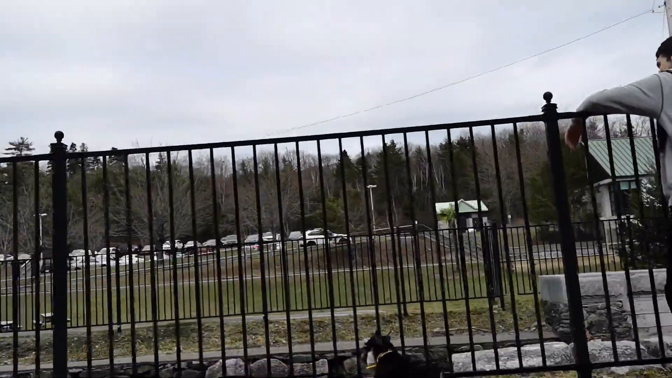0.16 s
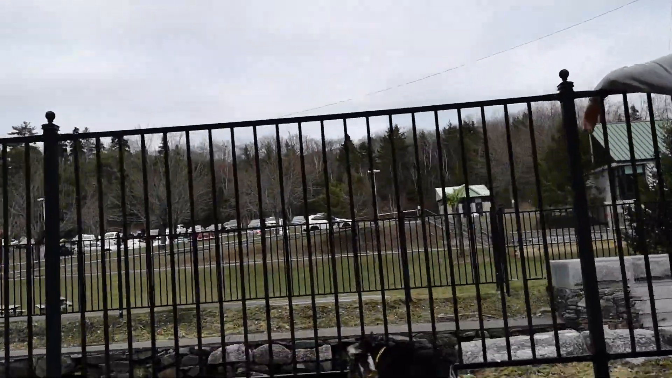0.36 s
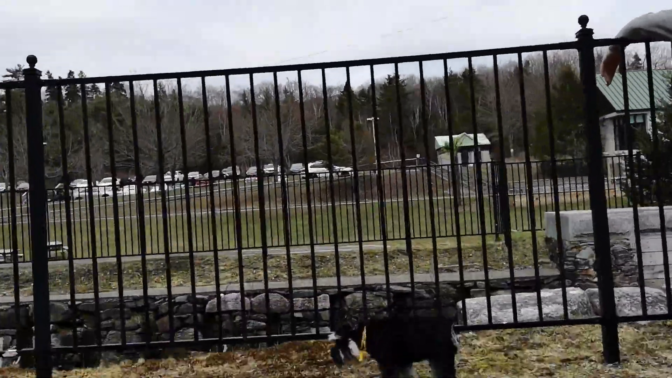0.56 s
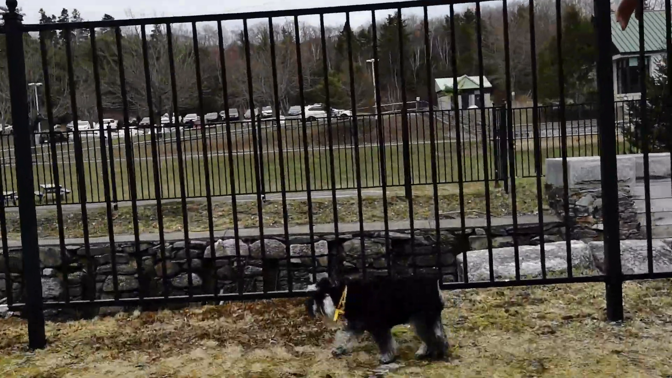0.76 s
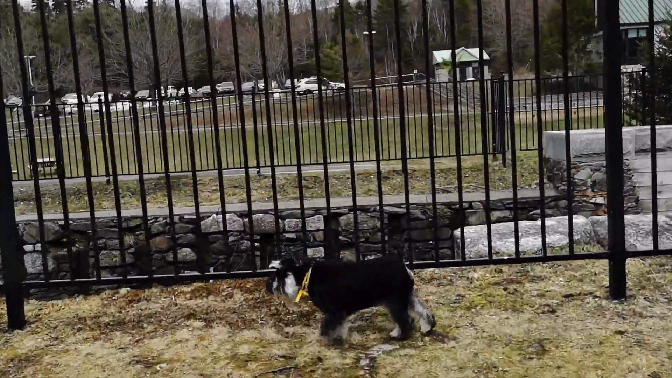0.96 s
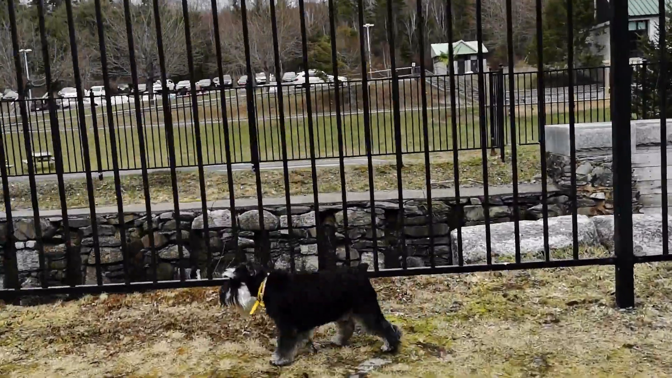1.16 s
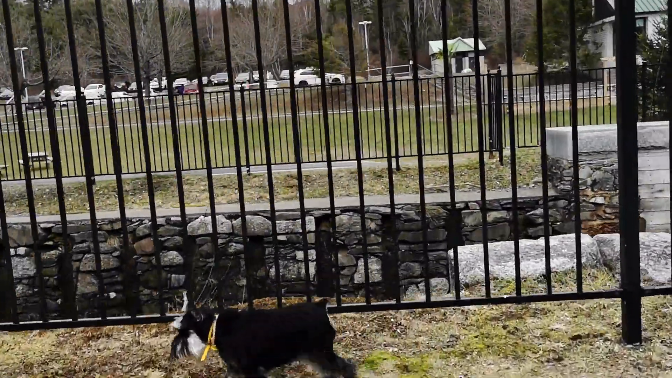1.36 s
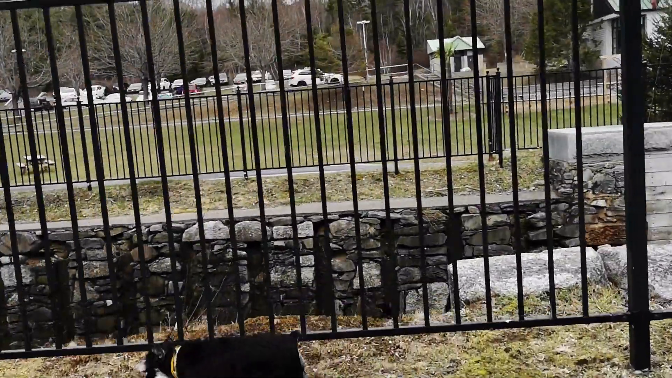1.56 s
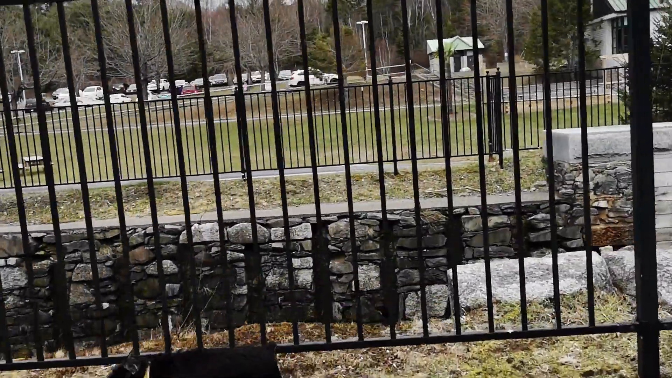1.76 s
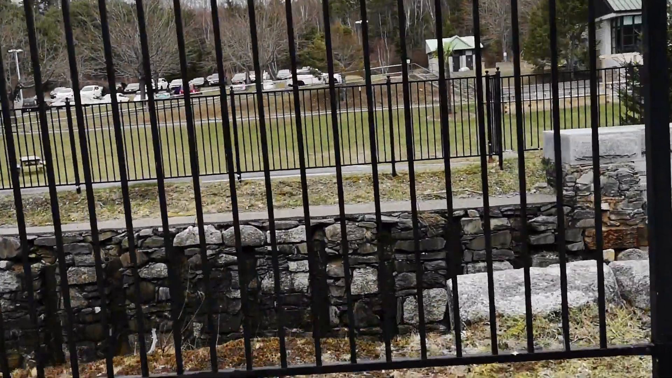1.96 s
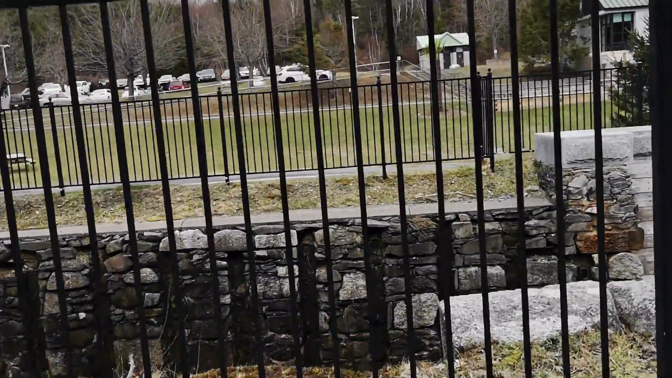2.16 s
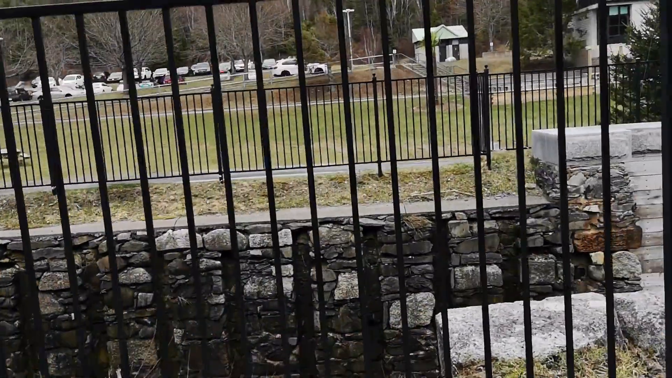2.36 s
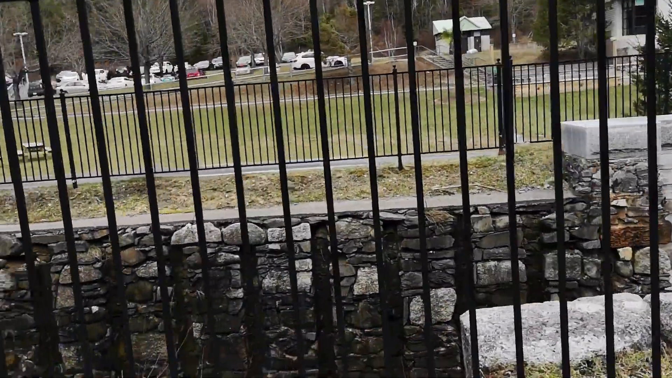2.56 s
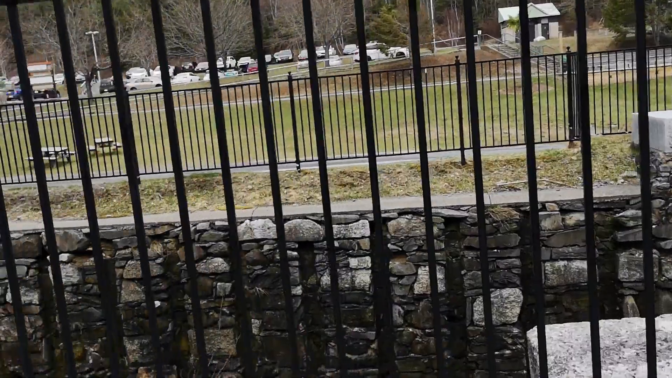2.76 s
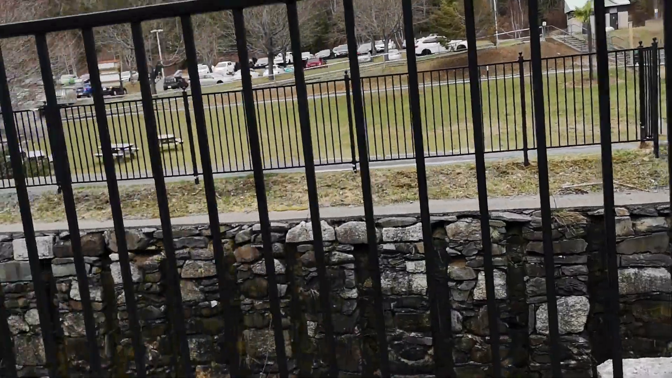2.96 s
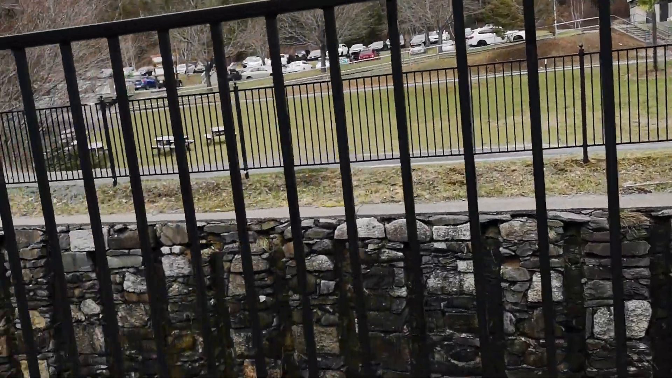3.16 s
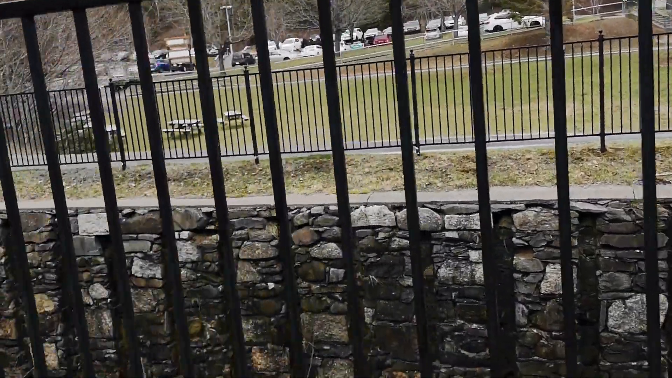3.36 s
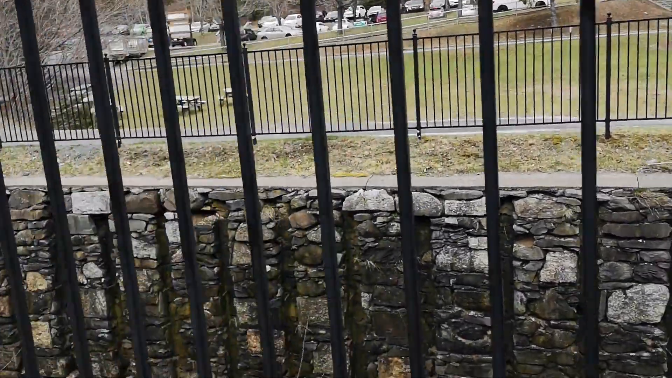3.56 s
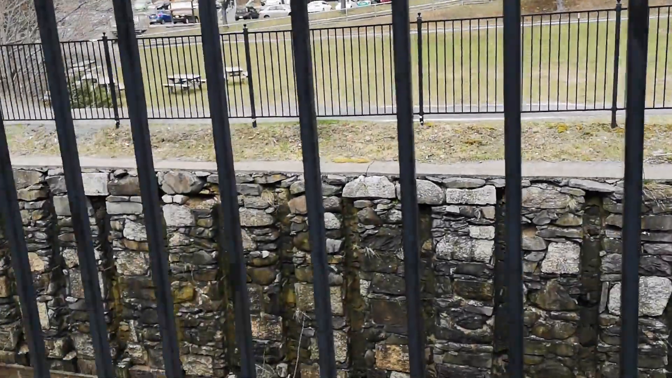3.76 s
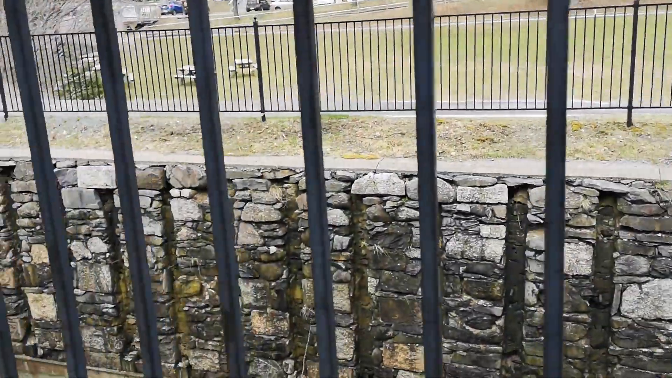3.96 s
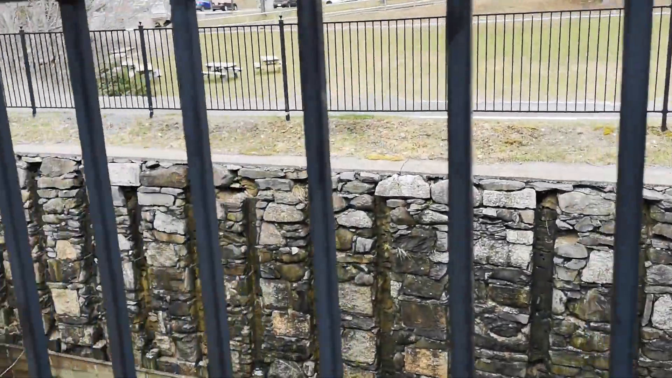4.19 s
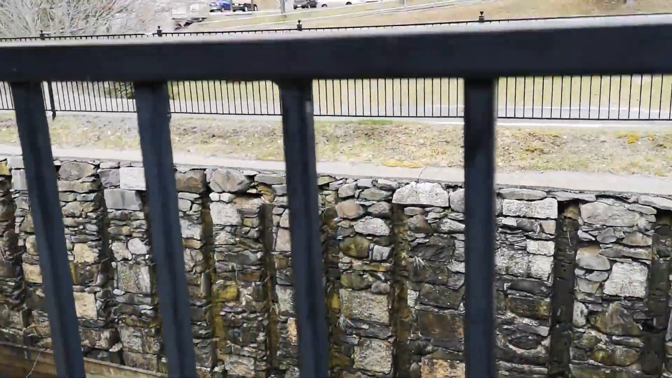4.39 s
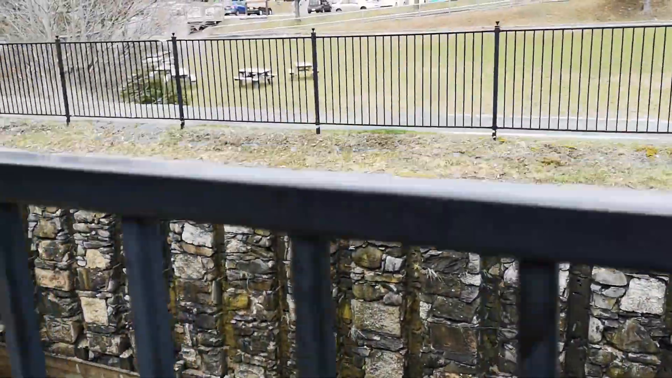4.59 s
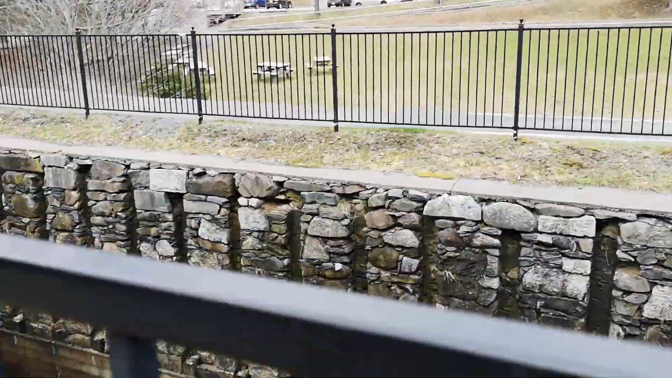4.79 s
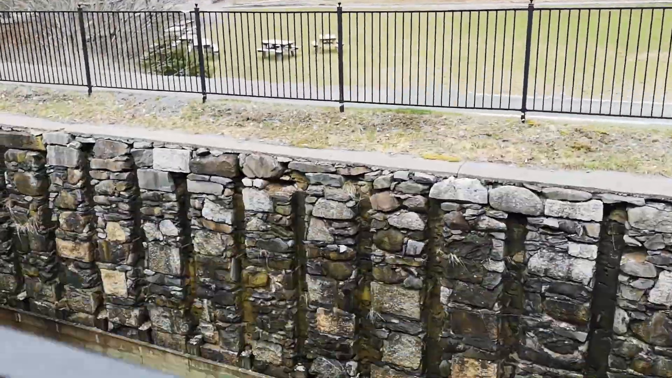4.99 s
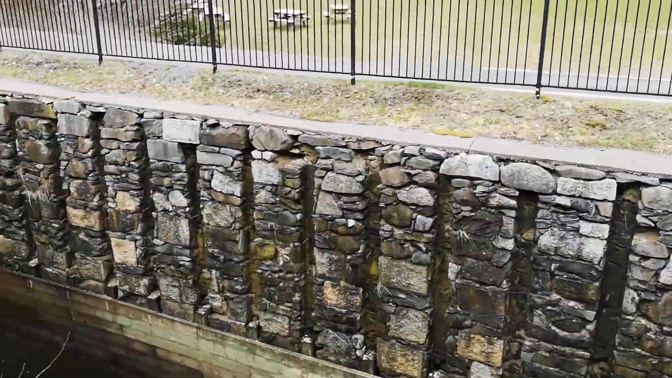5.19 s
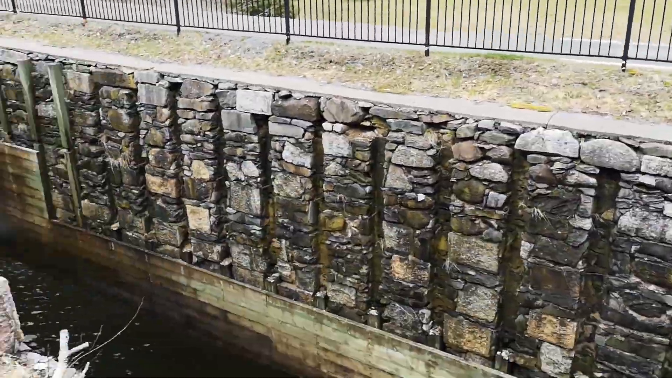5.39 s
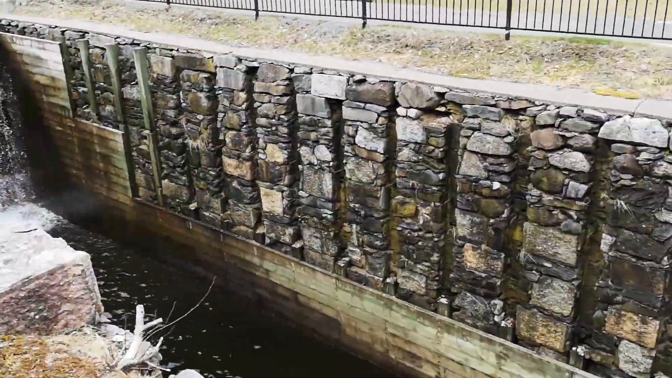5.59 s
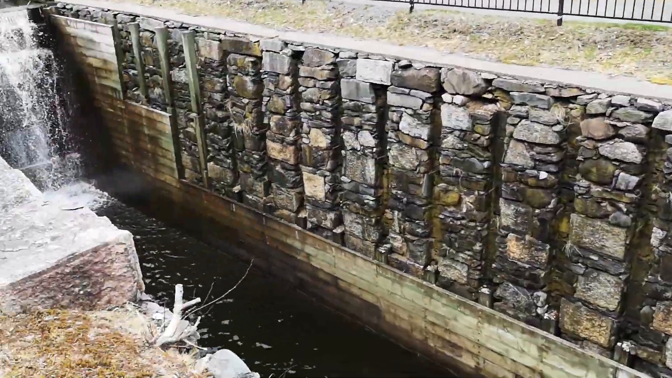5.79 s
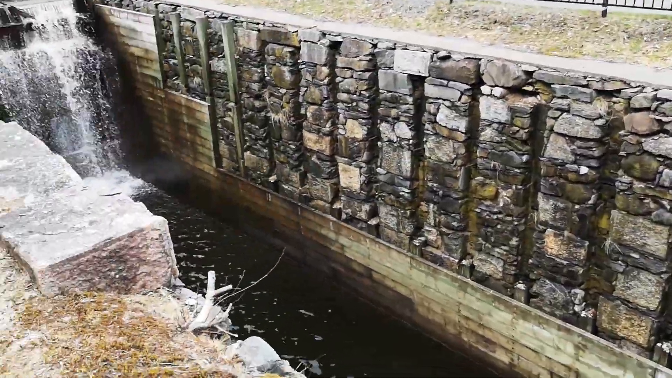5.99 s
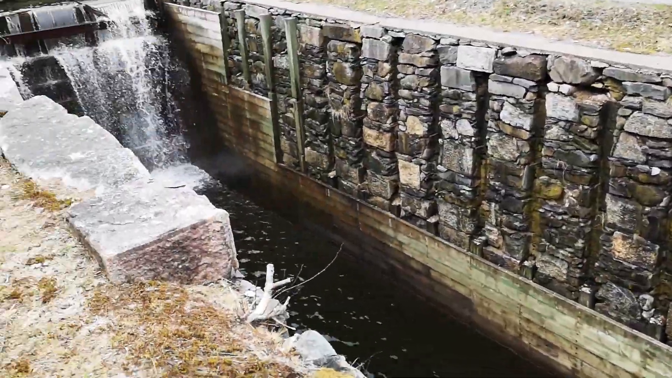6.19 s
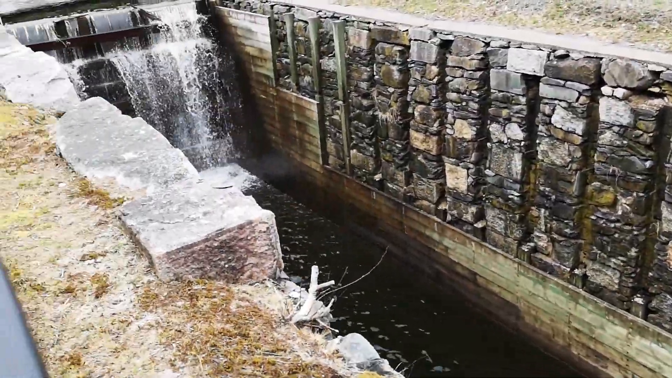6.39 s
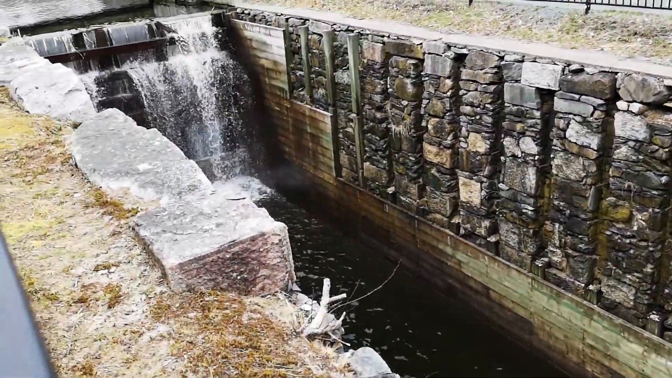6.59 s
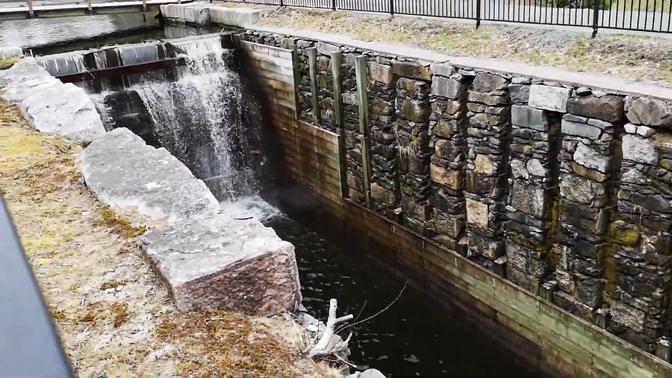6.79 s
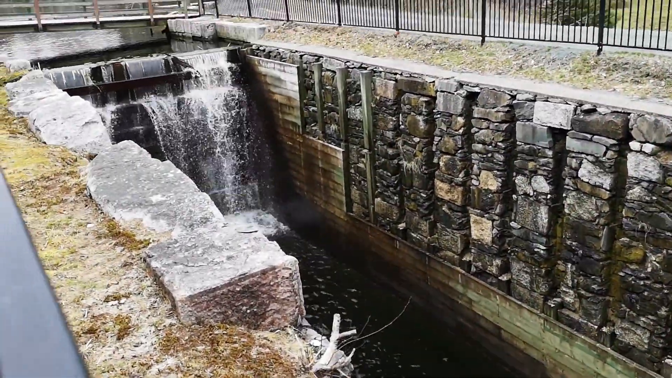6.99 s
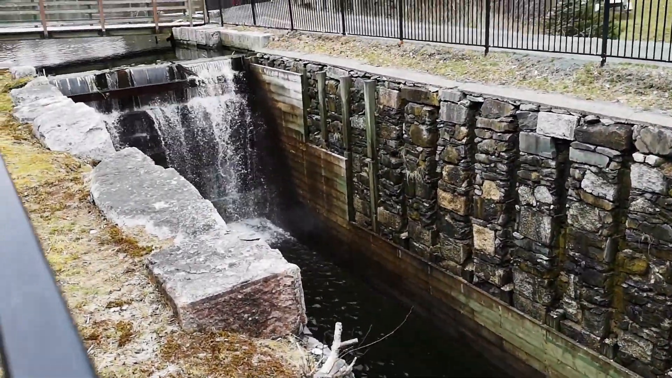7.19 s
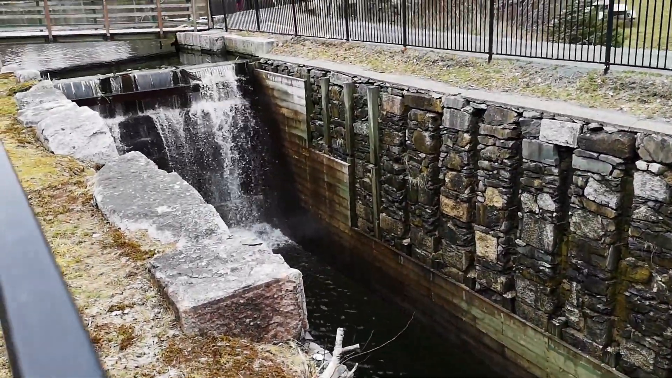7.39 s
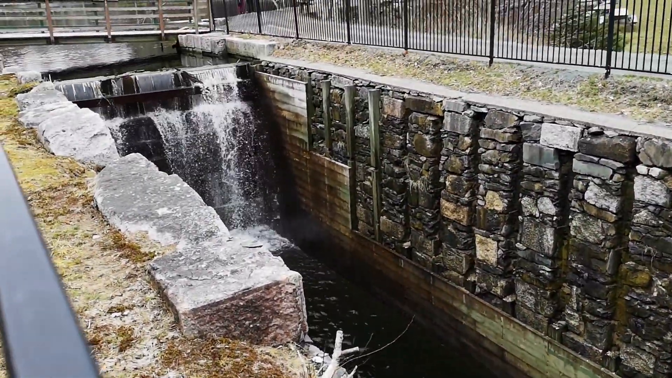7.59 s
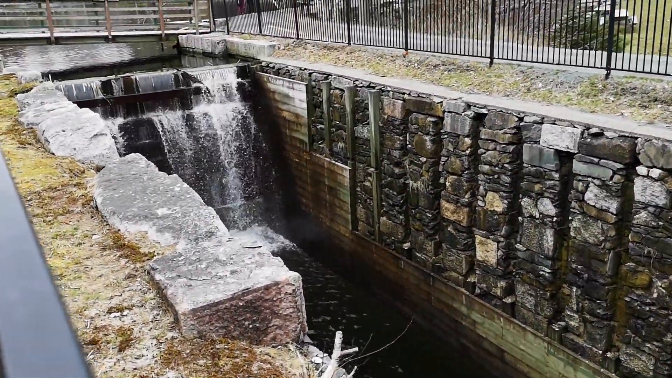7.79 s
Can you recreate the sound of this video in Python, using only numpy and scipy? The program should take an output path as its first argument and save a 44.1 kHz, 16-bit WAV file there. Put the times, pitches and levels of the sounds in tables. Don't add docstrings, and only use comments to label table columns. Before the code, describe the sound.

Outdoors in a park, a small waterfall pours into a stone-walled channel. Its steady roar and hiss begin at a distance, rise as a hand-held phone approaches the railing, then hold close and bright. A husky bird call fades at the very start, a twig snaps faintly, and low wind puffs and dull grip bumps touch the microphone, mostly near the end.

```python
import sys
import numpy as np
from scipy import signal
from scipy.fft import rfft, irfft, next_fast_len
from scipy.io import wavfile
from scipy.ndimage import uniform_filter1d, map_coordinates

SR = 44100
rng = np.random.default_rng(int(sys.argv[2]) if len(sys.argv) > 2 else 0)


def log_audio(samples):
    frames = np.atleast_2d(samples).T
    limited = np.clip(frames, -1, 1)
    pcm = np.round(limited * 32767).astype(np.int16)
    wavfile.write(sys.argv[1], SR, pcm)


def elevation(decibels):
    levels = np.asarray(decibels, float)
    return 10 ** (levels / 20)


N = 346185

# time in seconds, path to the fall in metres.
WALK = [(0, 17.3), (.57, 17.6), (1.5, 13.3), (2.47, 10.3), (3.12, 8.8), (3.54, 8.5), (3.89, 7.7),
        (4.24, 6.7), (4.5, 6.2), (4.66, 6.1), (5.0, 6.2), (5.44, 5.8), (5.98, 6.1), (6.06, 6.1),
        (6.8, 5.94), (7.85, 5.85)]
# time in seconds, bearing number
TURN = [
    (1, 0),
    (2.3, 1),
    (3.75, 1),
    (4.1, 2),
    (4.5, 2),
    (4.7, 3),
    (5.5, 3),
    (6.1, 4),
    (6.75, 5),
]
# bearing number, roar left over right in dB, spray over roar in dB,
# spray left over right in dB.
WATER_BALANCE = [
    (0, -4.5, -1.15, -2.6),
    (1, -3.5, -.4, -1.3),
    (2, 0.4, -0.65, 1.1),
    (3, 1.5, -1.1, -0.5),
    (4, 0.5, 0.8, -0.3),
    (5, 0.6, .1, -3.8),
]
# frequency in Hz, left level in dB, right level in dB,
# likeness of the two ports from 0 to 1, phase turn in radians.
ROAR_FAR = [(250.0, -11, 0.5, 1, 1.2), (350.0, -8.5, -6.5, 0.75, 0.5), (430, -15, -7.5, 0.36, -3),
            (557, -6.5, -10.5, 0.8, -3), (700.0, -6.5, -9, 0.23, -3), (845, -6, -8.5, 0.74, -0.4),
            (1030, -8.5, -2.5, 0.92, -1.76), (1350.0, -11, -8.5, 0.56, 1.9), (1620, -8, -6, 0.6, -3),
            (1820, -1.5, 2.5, 0.9, -0.8), (2250.0, -9, -2, 0.7, -2), (2720, -3.5, -2, 0.36, -2.5),
            (3240, -12.5, -8.5, 0.53, -3), (4200.0, -7, -4, 0.06, -4)]
ROAR_AWAY = [(250.0, -10, -1.5, 0.66, 0.1), (355, -10, -7.5, 1, -0.5), (436, -19, -7.5, 0.28, -3.5),
             (563, -11, -13.5, 0.9, -3.0), (704, -9.5, -14.5, 0.31, -4), (850.0, -6, -9, 0.66, -0.5),
             (1030, -6, -1, 0.62, -1), (1280, -15, -6.5, 0.43, -0.2), (1600.0, -4.5, -2, 0.84, 3.5),
             (1880, -8.5, 0.5, 0.38, -0.5), (2160, -3.5, 0.3, 0.62, -1.4), (2630, -5, -3, 0.35, -2.5),
             (3320, -8.5, -8, 0.44, -2.1), (4200.0, -6, -7.5, 0.13, -16)]
ROAR_RAIL = [(250.0, -8, -2, 0.89, 0), (345, -11.5, -7.4, 0.9, 0.0), (440.0, -17, -11, 0.14, 1),
             (560.0, -10.5, -14, 0.97, -3), (700.0, -15, -11.5, 0.33, -2.5), (840, -3.5, -11, 0.68, -1),
             (1050.0, -6.5, -1, 0.95, -0.3), (1360, -9.5, -7.5, 0.32, -1.5), (1600.0, -2, -4, 0.33, -2),
             (1900.0, -2, -5, 0.29, -1.5), (2220, 1, 0.5, 0.82, -2.5), (2680, -3.5, -5.5, 0.22, 0),
             (3240, -6.5, -9.5, 0.5, -1.1), (4200.0, -12, -9, 0.11, -6)]
ROAR_WALL = [(250.0, -12, -5, 0.61, 0), (352, -11.5, -9.5, 0.86, -0.0), (440.0, -17, -10.6, 0.32, -3),
             (547, -10.5, -14.5, 0.83, -3), (706, -9, -14, 0.44, -2.5), (840, -6, -9, 0.59, -0.7),
             (1060, -5.5, -5, 0.64, -0.7), (1370, -13, -5, 0.39, -1), (1600.0, -1.5, -5.5, 0.27, -1.5),
             (1900.0, 0.5, -2.5, 0.34, -1.5), (2250.0, 0, -4, 0.5, -0.6), (2790, -0.3, -3.5, 0.61, -1.4),
             (3100, -8, -11.5, 0.05, -8), (4200.0, -5.5, -4.5, 0.22, 1)]
ROAR_FALL = [(241, -3.5, -3.5, 0.96, -0.5), (350.0, -13, -9.5, 0.96, -0.1), (448, -17, -12.5, 0.54, 0.9),
             (565, -16.5, -15, 1, 4), (660, -20.5, -18, 0.25, 0.5), (840, -8.5, -6.5, 1, -1.5),
             (1010, -6, -5, 0.8, -1), (1360, -8.5, -6.5, 0.81, -1.5), (1550, -12, -9, 0.56, 2),
             (1920, -1.5, -0.5, 0.16, 0), (2340, -0.5, -4, 0.56, 2.5), (2700.0, -6, -12, 0.18, 1.5),
             (3100, -8.5, -8.5, 0.29, 1.5), (4200.0, -12, -4.5, 0.27, 2.5)]
# frequency in Hz, left level in dB, right level in dB.
SPRAY_AWAY = [(3800.0, -10, -7), (4800.0, -4.5, -3.5), (5930, -2.5, -3), (6350, -4.5, -5.5),
              (7050, -2.5, -1), (7600, 0.5, -2.5), (8400.0, -3.5, -5), (9000.0, -6.5, -0.5), (9500, -9, -5),
              (9940, -22, -8.5), (11500.0, -23, -15.5), (13100, -19.5, -21.5), (15000.0, -27, -21.5)]
SPRAY_RAIL = [(3800.0, -14, -8), (4800.0, -14.3, -9), (5700, -9, -6), (6150, -10, -12), (7000.0, -2.5, -6),
              (7800.0, -2, -8), (8400.0, -6, -10), (9000.0, -4.5, -6.5), (9460, -15.0, -9),
              (10000.0, -19.3, -14.8), (11500.0, -25, -21), (13000.0, -24, -27), (15000.0, -26.3, -29)]
SPRAY_WALL = [(3800.0, -7, -13), (4760, -10.5, -7), (5500, -7.5, -3.5), (6260, -9, -10), (6940, -3.5, -5),
              (7750, 0.0, -6.5), (8400.0, -5, -8), (9000.0, -8, -3.5), (9500.0, -18, -6.9),
              (10000.0, -16, -12.5), (11500.0, -21.4, -18), (13000.0, -21, -22), (15000.0, -24.2, -24.6)]
SPRAY_FALL = [(3800.0, -11, -27), (4680, -13, -10), (5700, -11, -4.5), (6300.0, -9, -7.5),
              (7000.0, -6.5, -2), (7900, -0.5, -4.5), (8300, -13.5, -1.5), (8900, -11, 0.5),
              (9480, -13, -2.5), (10000.0, -24, -6.5), (11500.0, -31, -9), (13000.0, -21, -17.5),
              (15000.0, -26, -20)]
# samples the right port trails, frequency in Hz it starts from.
PORT_LAG = [
    (22, 700),
    (22, 700),
    (22, 700),
    (22, 700),
    (48, 1500),
]
# frequency in Hz, level in dB per Hz.
RUMBLE_COLOUR = [(7.1, -34), (12, -7), (87, -0.5), (129, -3.5), (331, -10.5), (400, -15), (520, -41),
                 (880, -120)]
# bearing number, level change in dB.
SHELTER = [
    (0, 0),
    (1, 0.5),
    (2, -0.2),
    (3, -1),
    (4, 0),
    (5, 0),
]
# time of the peak in seconds, half length in seconds, peak level in dB.
GUSTS = [
    (.55, 0.23, -46),
    (3.3, 0.15, -44),
    (5.126, .045, -39),
    (6.326, 0.065, -36),
    (6.5, 0.1, -47),
    (6.683, 0.086, -30.5),
    (6.9, 0.075, -32),
    (7.17, 0.11, -39),
    (7.384, 0.21, -42.5),
    (7.85, .09, -48),
]
# frequency in Hz, level in dB per Hz.
PUSH_COLOUR = [(6, -16), (14, 3), (30, 6), (55, -2.5), (110, -17), (300, -48)]
# frequency in Hz, level in dB per Hz.
SHEAR_COLOUR = [(8, -20), (15, -3), (35, 0), (90, -5), (200, -14), (400, -40)]
# time in seconds, peak level in dB, frequency in Hz.
JOLTS = [(.67, -33, 54.7), (1.268, -29, 75), (3.17, -37, 60), (5.117, -32, 45), (5.121, -25, 141),
         (5.8, -29, 75), (7.01, -25.5, 65.5), (7.18, -30, 50.3), (7.29, -38, 40), (7.42, -32, 35),
         (6.45, -32, 35), (6.56, -32, 60)]
# time in seconds, peak level in dB.
TWIG_SNAPS = [
    (.577, -38),
]
# start in seconds, hold in seconds, pitch in Hz, level in dB.
BIRD_NOTES = [
    (-.03, .1, 2060, -42),
    (.11, .04, 1890, -48),
    (.19, .11, 2100, -55),
]
# frequency in Hz, how readily small cells drop out (no unit).
DROPOUTS = [(2000, -1), (3200, 1.2), (4500, .6), (8500, 0), (10000, 1.6), (12000, 1.95), (15000, 2.05)]

ROAR_DB, RUMBLE_DB = -17.5, -34
RUMBLE_FOLLOWS = .3
RAIL_S, RAIL_HALF_S, RAIL_SHADE_DB = 4.68, 0.15, 1.9
CALM_DB, CALM_SHEAR_DB = -61.5, -75
SHEAR_UNDER_DB = 17
SNAP_HZ, SNAP_WIDTH_HZ, SNAP_S = 3500, 920, .006
SAG_HZ_PER_S2, NOTE_RISE_S, NOTE_FADE_DB_PER_S = 11000, .012, 400
LOW_HZ, HIGH_HZ = 290, 4000
LENGTH = next_fast_len(N + 8192)
HZ = np.fft.rfftfreq(LENGTH, 1 / SR) + 1
TIME = np.arange(N) / SR


def waterfall():
    bearing = columns(TURN, TIME)[0]
    roar_pan, spray_over_db, spray_pan = columns(WATER_BALANCE, bearing)
    roar_db = ROAR_DB + nearness_db()
    rail_shade = np.exp(-((TIME - RAIL_S) / RAIL_HALF_S) ** 2)
    spray_db = roar_db + spray_over_db - RAIL_SHADE_DB * rail_shade
    side = np.array([[.5], [-.5]])
    roars = [ROAR_FAR, ROAR_AWAY, ROAR_RAIL, ROAR_WALL, ROAR_FALL]
    sprays = [SPRAY_AWAY, SPRAY_AWAY, SPRAY_RAIL, SPRAY_WALL, SPRAY_FALL]
    last = len(roars) - 1
    out = np.zeros((2, N))
    for k, (low, high, (lag, from_hz)) in enumerate(zip(roars, sprays, PORT_LAG)):
        facing = np.sqrt(np.clip(1 - np.abs(np.minimum(bearing, last) - k), 0, 1))
        out += facing * elevation(roar_db + 3 + side * roar_pan) * roar(low, lag, from_hz)
        out += facing * elevation(spray_db + 3 + side * spray_pan) * spray(high, lag)
    return out * elevation(0.28 * wobble(6.5))


def roar(table, lag, from_hz):
    left_db, right_db = columns(table, HZ, np.log)[:2]
    like = [(hz, share * np.cos(turn), share * np.sin(turn)) for hz, _, _, share, turn in table]
    real, imag = columns(like, HZ, np.log)
    delay = np.exp(-2j * np.pi * np.maximum(HZ - from_hz, 0) * lag / SR)
    shared = (real + 1j * imag) * delay
    a, b = patchy(patchy_db=.5)
    right = shared * a + np.sqrt(np.clip(1 - np.abs(shared) ** 2, 0, 1)) * b
    band = over(LOW_HZ, order=8) * np.sqrt(1 - over(HIGH_HZ, order=16) ** 2)
    return unit(irfft(band * elevation([left_db, right_db]) * [a, right], LENGTH)[:, :N])


def spray(table, lag):
    a, b = patchy(patchy_db=0.1)
    right = b + .16 * a * np.exp(-2j * np.pi * HZ * lag / SR)
    left = a * elevation(2.3 / (1 + ((HZ - 7780) / 250) ** 2))
    colour = over(HIGH_HZ, order=16) * elevation(columns(table, HZ, np.log))
    return unit(irfft(colour * [left, right], LENGTH)[:, :N])


def nearness_db():
    return -20 * np.log10(columns(WALK, TIME)[0])


def rumble():
    colour = elevation(columns(RUMBLE_COLOUR, HZ, np.log)[0]) * np.sqrt(1 - over(LOW_HZ, order=8) ** 2)
    alike, other = patchy(patchy_db=0.5) * colour
    apart = other * (HZ / 800) ** 1.38
    mid, side = irfft([alike, apart], LENGTH)[:, :N]
    shelter_db = columns(SHELTER, columns(TURN, TIME)[0])[0]
    level = elevation(RUMBLE_DB + RUMBLE_FOLLOWS * nearness_db() + shelter_db)
    return level * np.array([mid + side, mid - side]) / mid.std()


def wind():
    colour = elevation([columns(PUSH_COLOUR, HZ, np.log)[0], columns(SHEAR_COLOUR, HZ, np.log)[0]])
    buffet = unit(irfft(patchy(patchy_db=2.5) * colour, LENGTH)[:, :N])
    strength = np.abs(uniform_filter1d(buffet ** 2, size=3000, axis=1))
    buffet = unit(buffet / np.sqrt(strength + 0.14))
    gusts = sum(elevation(db) * np.exp(-((TIME - s) / half) ** 2) for s, half, db in GUSTS)
    calm = elevation([[CALM_DB], [CALM_SHEAR_DB]])
    push, shear = (calm + elevation([[0], [-SHEAR_UNDER_DB]]) * gusts) * buffet
    return np.array([push + shear, push - shear])


def jolts():
    out = np.zeros(N)
    for s, db, hz in JOLTS:
        cycles = (TIME - s) * hz
        out += elevation(db) * np.exp(-(cycles / 0.81) ** 2) * np.sin(2 * np.pi * cycles)
    return out * elevation(0) * np.array([[1], [1]]) * elevation([[-.7], [.7]])


def bird():
    out = np.zeros(N)
    for s, hold, hz, db in BIRD_NOTES:
        age = np.clip(TIME - s, 0, .5)
        pitch = hz - SAG_HZ_PER_S2 * age ** 2 + 75 * wobble(250)
        phase = 2 * np.pi * np.cumsum(pitch) / SR
        under = elevation(-4 + 3 * wobble(60)) * np.clip(age / hold, 0, 1) * np.sin(.86 * phase)
        rise = 1 - np.exp(-age / NOTE_RISE_S)
        fade = elevation(-NOTE_FADE_DB_PER_S * np.maximum(TIME - s - hold, 0))
        out += elevation(db + 5) * rise * fade * (np.sin(phase) + under)
    return out * elevation([[-4], [4]])


def twig():
    noise = rfft(rng.standard_normal(LENGTH))
    snap = unit(irfft(noise / (1 + ((HZ - SNAP_HZ) / SNAP_WIDTH_HZ) ** 2), LENGTH)[:N])
    shape = sum(elevation(db) * (TIME > s) * np.exp(-np.abs(TIME - s) / SNAP_S) for s, db in TWIG_SNAPS)
    return shape * snap * elevation([[-3], [3]])


def patchy(patchy_db):
    z = signal.stft(rng.standard_normal((2, LENGTH)), nperseg=512)[2]
    field = uniform_filter1d(rng.standard_normal(z.shape[1:]), size=7, axis=0)
    field = uniform_filter1d(field, size=12, axis=1)
    noise = signal.istft(z * elevation(patchy_db * field / field.std()), nperseg=512)[1]
    return rfft(noise[:, :LENGTH])


def over(edge_hz, order):
    return 1 / np.sqrt(1 + (edge_hz / HZ) ** order)


def wobble(rate):
    knots = rng.standard_normal(int(N * rate / SR) + 4)
    return map_coordinates(knots, [np.arange(N) * rate / SR])


def columns(rows, at, warp=lambda v: v):
    first, *cols = np.transpose(rows)
    return [np.interp(warp(at), warp(first), c) for c in cols]


def unit(x):
    return x / np.sqrt(np.mean(np.abs(x) ** 2, axis=-1, keepdims=True) + 1e-20)


def scene():
    return waterfall() + rumble() + wind() + jolts() + bird() + twig()


def thinned(x):
    hz, t, z = signal.stft(x, SR, nperseg=1024)
    cells = uniform_filter1d(rng.standard_normal(z.shape[1:]), size=5, axis=0)
    cells = uniform_filter1d(cells, size=4, axis=1)
    share = columns(DROPOUTS, hz + 1, np.log)[0][:, None]
    kept = cells / cells.std() < 3 - share
    flutter = elevation(.5 * np.clip(share - .5, 0, 1) * np.interp(t, TIME, wobble(20)))
    return signal.istft(z * flutter * kept, SR, nperseg=1024)[1][:, :N]


def band_limit(x):
    return signal.sosfilt(signal.butter(12, 15200, fs=SR, output="sos"), x)


def record(dry):
    return band_limit(thinned(dry))


dry = scene()
out = record(dry)
log_audio(out)
```